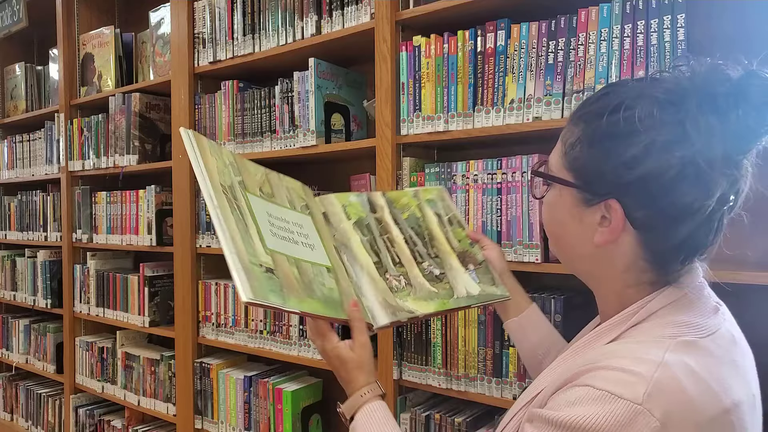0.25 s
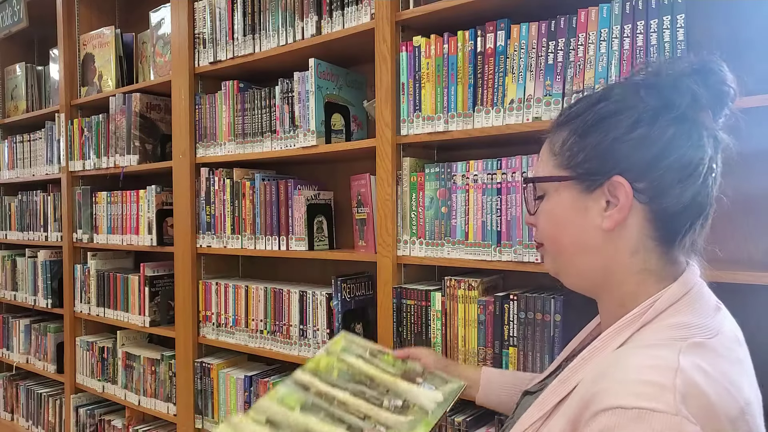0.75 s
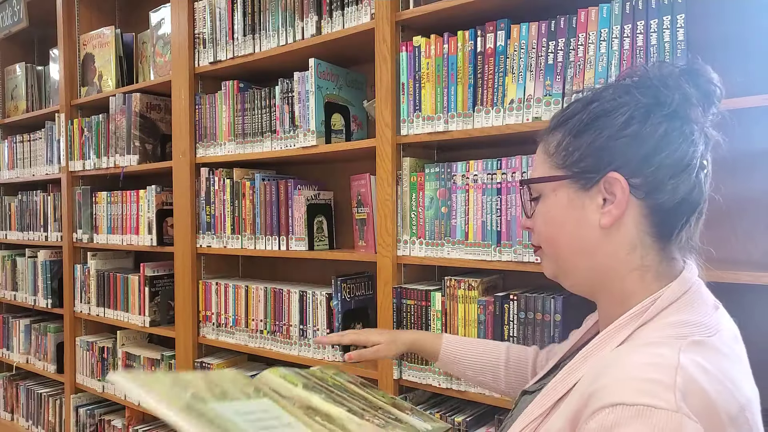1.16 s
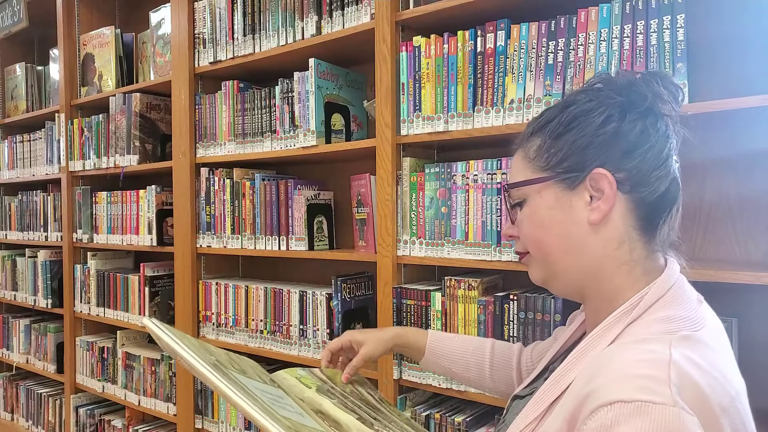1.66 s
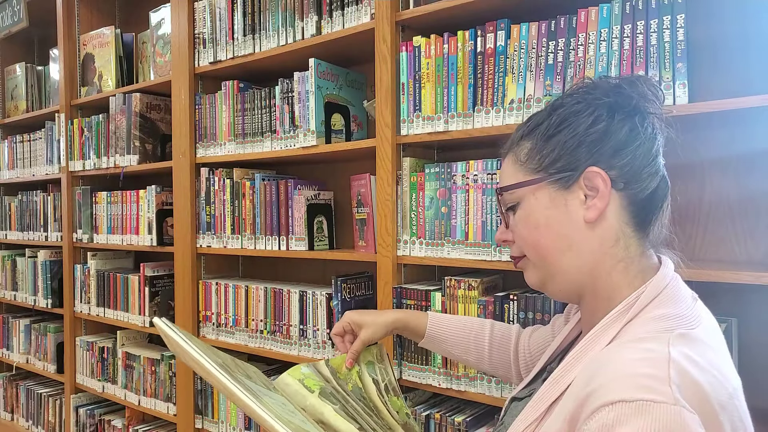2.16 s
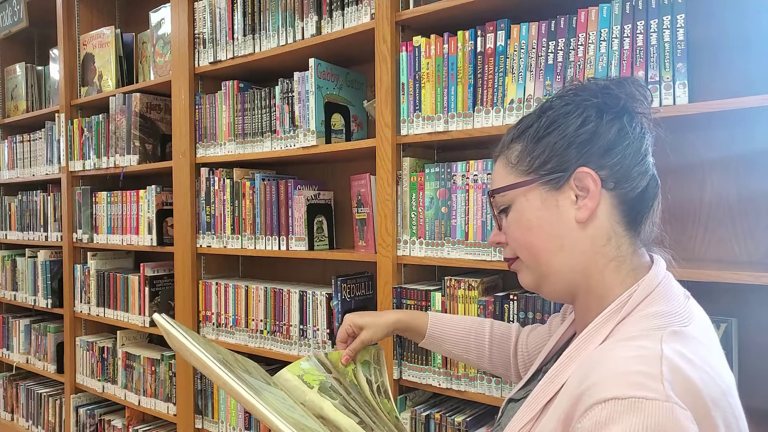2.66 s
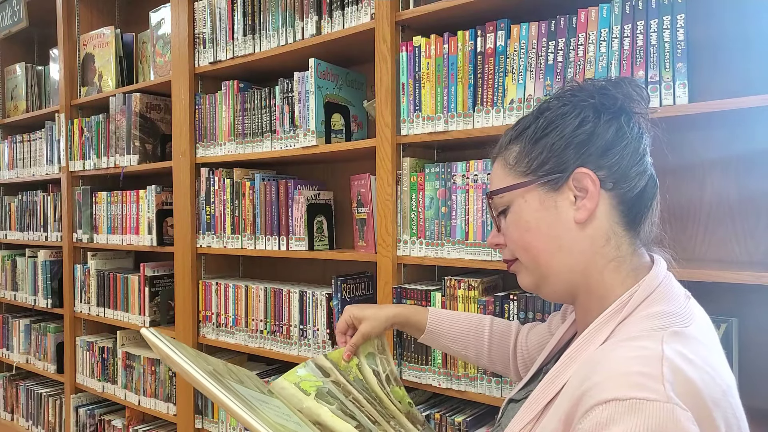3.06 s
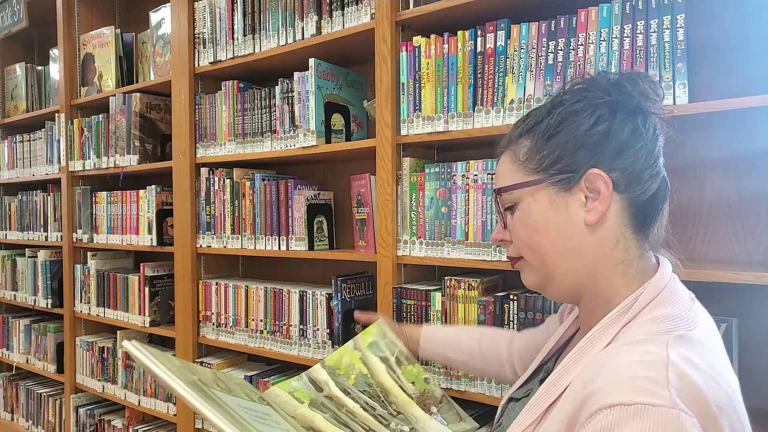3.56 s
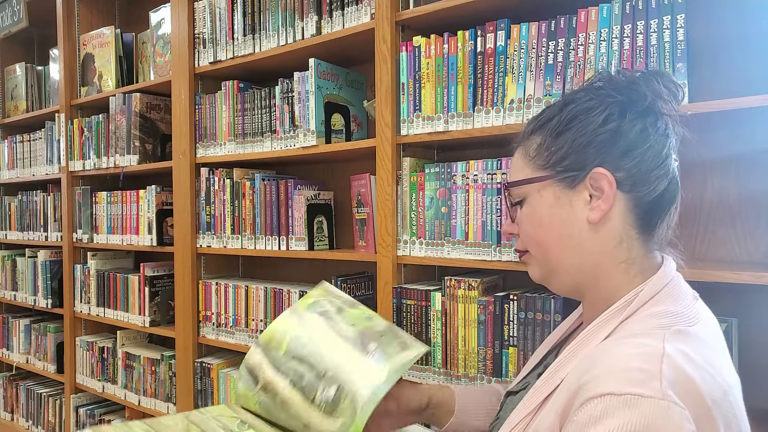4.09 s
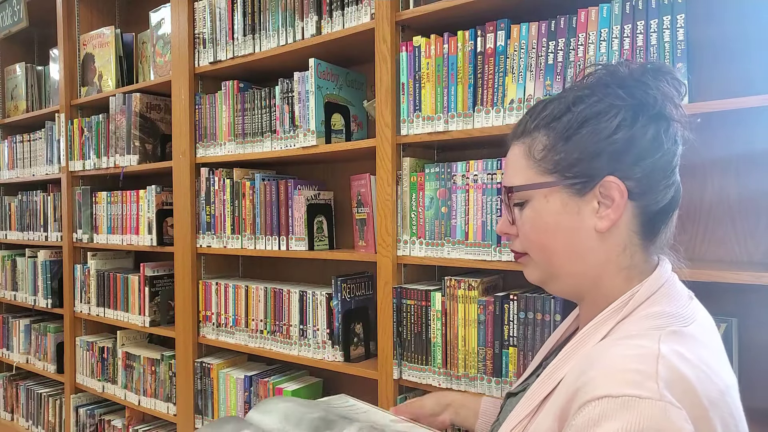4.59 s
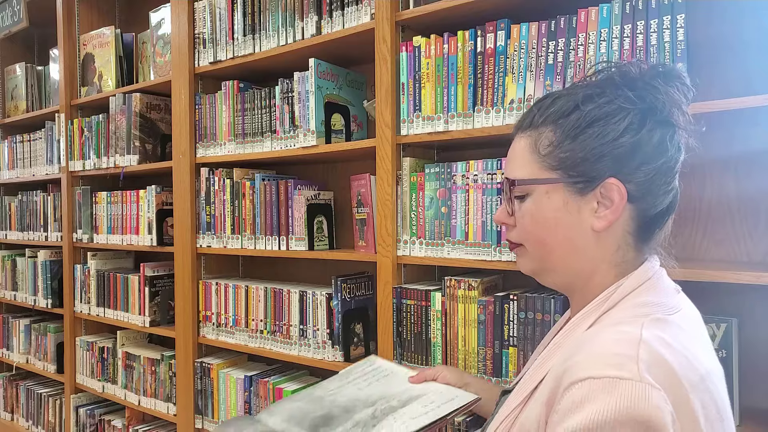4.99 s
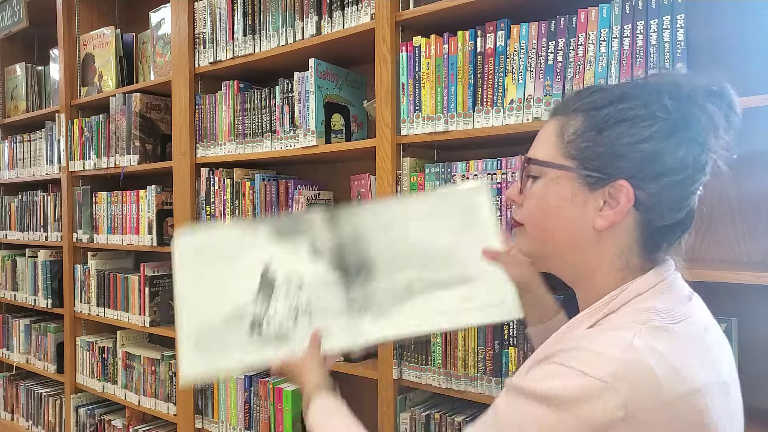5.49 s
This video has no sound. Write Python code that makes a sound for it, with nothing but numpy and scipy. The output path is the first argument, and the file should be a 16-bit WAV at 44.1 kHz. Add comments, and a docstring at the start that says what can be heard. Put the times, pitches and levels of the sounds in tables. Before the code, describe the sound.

A large picture book is handled close by, slightly to the right, in a quiet library. For the first second, hands brush and scuff its glossy pages, with a few crisp ticks around 0.8 seconds. Faint touches follow. From about 2 seconds, a page slides over its neighbour in short, darker pulls, with small ticks and pops near 2.5 seconds. Between 3 and 4 seconds the stiff sheet bends, crackling and buckling in flurries with a hollow, briefly ringing tone. After a short lull it flips over with the loudest cluster of snaps at about 4.4 seconds. From 4.8 seconds, hands rub and rasp dryly across the paper again, fading to light brushes by about 5.6 seconds. The room adds a short, soft reverberation, and a low, steady ventilation hum with faint hiss lies under everything.

```python
"""A quiet library: a large picture book is lowered, a stiff page is turned, and the book is raised again.
Hands brush and scuff the glossy paper and sheet slides on sheet, fibres catching and letting go.
Creases tick, and the bent page buckles in pops and flurries with a hollow, briefly ringing colour.
Shelves give a short, soft reverberation over the hum of the ventilation."""
import sys
import numpy as np
from scipy import signal
from scipy.fft import rfft, irfft
from scipy.io import wavfile

SR = 44100
rng = np.random.default_rng(int(sys.argv[2]) if len(sys.argv) > 2 else 0)


def dump_mix(stems):
    """Bounce the given channels to the path in sys.argv[1] as a 16-bit WAV at rate SR."""
    frames = np.atleast_2d(stems).T  # one column per channel
    limited = np.clip(frames, -1, 1)  # hard clip at full scale
    pcm = np.round(limited * 32767).astype(np.int16)
    wavfile.write(sys.argv[1], SR, pcm)


N = 252770
TIME = np.arange(N) / SR

# tone colour of skin rubbing glossy paper: frequency_hz, gain_db
SKIN_EQ = [(150, -1), (450, -4.5), (650, -6), (1000, 0), (2000, -2), (2900, -1), (4200, -4), (6300, -0.5),
           (7600, -6), (11000, -6.5), (15500, -7)]


def undb(db):
    """Decibels to gain."""
    return 10 ** (np.asarray(db) / 20)


def gain(eq, hz):
    """Gain of a (Hz, dB) curve at the given frequencies."""
    eq_hz, eq_db = np.transpose(eq)
    return undb(np.interp(np.log(hz + 1), np.log(eq_hz), eq_db))


def colour(x, eq, size=2048):
    """Causal filter with the given EQ curve, built from its cepstrum."""
    cepstrum = irfft(np.log(gain(eq, np.fft.rfftfreq(size, 1 / SR))))
    cepstrum[1:size // 2] *= 2
    cepstrum[size // 2 + 1:] = 0
    response = irfft(np.exp(rfft(cepstrum)))[:size // 2]
    response = response.reshape((1,) * (x.ndim - 1) + (-1,))
    return signal.fftconvolve(x, response, axes=-1)[..., :x.shape[-1]]


def band(x, hz, kind, order=2):
    """Butterworth filter."""
    sos = signal.butter(order, np.minimum(hz, SR / 2 - 1), kind, fs=SR, output="sos")
    return signal.sosfilt(sos, x)


def rms(x):
    """Root mean square."""
    return np.sqrt(np.mean(x ** 2)) + 1e-12


def unit_band(x, low_hz, high_hz):
    """One band of a stereo sound, scaled so that its mono mix has rms 1."""
    y = band(x, [low_hz, high_hz], "band", order=3)
    return y / rms(y.mean(axis=0))


def add(track, start_s, x):
    """Mix a sound into a track."""
    i = max(int(start_s * SR), 0)
    track[..., i:i + x.shape[-1]] += x[..., :N - i]


def wander(rate_hz):
    """Smooth random drift with a standard deviation near 1."""
    return np.interp(TIME * rate_hz, np.arange(4096), rng.standard_normal(4096)) * np.sqrt(1.5)


def grains(per_s, spread_db):
    """Random tiny impulses of either sign, a few much larger than the rest."""
    size = undb(spread_db * np.minimum(rng.exponential(size=N), 4))
    x = (rng.random(N) < per_s / SR) * size * np.sign(rng.standard_normal(N))
    return x / rms(x)


def widen(centre, side, above_hz, width):
    """A broad source: left and right agree in the bass and part in the treble."""
    side = width * band(side, above_hz, "high", order=1)
    return np.array([centre + side, centre - side])


def burst(x, start_s, hold_s, attack_s=0.0022, fade_s=0.014):
    """A stretch of x, brought to rms 1, that rises, holds, then dies away."""
    piece = x[..., int(start_s * SR):][..., :SR // 5]
    t = TIME[:piece.shape[-1]]
    envelope = np.minimum(t / attack_s, 1) * np.exp(-np.maximum(t - hold_s, 0) / fade_s)
    return piece / rms(piece[..., t < hold_s + fade_s]) * envelope


def ventilation():
    """Duct rumble and faint hiss under slightly wavering fan and mains tones."""
    # tone colour of the duct air: frequency_hz, gain_db
    air_eq = [(15, -41.5), (33, -7), (52, 2.5), (80, -11), (102, -5), (150, -14), (240, -18), (400, -25),
              (600, -39.5), (1200, -42), (2800, -48), (6200, -41.5), (7400, -54), (16000, -53)]
    # fan and mains tones: pitch_hz, level_db
    hum_tones = [(34.5, -56.5), (69.2, -50.5), (118.6, -62)]
    centre, side, diffuse = rng.standard_normal((3, N))
    air = widen(centre, side, above_hz=695, width=0.94) + 0.16 * np.array([diffuse, -diffuse])
    air = irfft(rfft(air) * gain(air_eq, np.fft.rfftfreq(N, 1 / SR)), N)
    above_rumble = band(air.mean(axis=0), 135, "high", order=6)
    air *= undb(-61.5) / rms(above_rumble)
    hum = np.zeros(N)
    for pitch_hz, level_db in hum_tones:
        amplitude = np.sqrt(2) * undb(level_db + 1.8 * wander(4.9))
        phase = 2 * np.pi * np.cumsum(pitch_hz + 1.246 * wander(5)) / SR
        hum += amplitude * np.sin(phase)
    return air + hum


def room(x, early_db, early_t60, late_db, late_t60, treble_t60):
    """Near shelves scatter the sound at once; the aisle holds a soft tail, shorter in the treble."""
    t = TIME[:SR // 2]
    early, late = rng.standard_normal((2, 2, len(t)))
    early = widen(*early, above_hz=700, width=0.093) * (t > 0.003) * undb(-60 * t / early_t60)
    late = widen(*late, above_hz=750, width=1.0)
    low = band(late, 3000, "low", order=1)
    late = low * undb(-60 * t / late_t60) + (late - low) * undb(-60 * t / treble_t60)
    late *= np.minimum(t / 0.024, 1)
    response = sum(undb(db) * echoes / np.sqrt(np.sum(echoes ** 2) / 2)
                   for db, echoes in [(early_db, early), (late_db, late)])
    return x + signal.fftconvolve(x, response, axes=-1)[:, :N]


def friction(eq, per_s, spread_db, judder_db, crackle_db):
    """Fibres catch and let go in uneven spurts, with a sparser crackle, and the paper radiates them."""
    catches = widen(grains(per_s, spread_db), grains(per_s, spread_db), above_hz=2100, width=1.0)
    crackle = undb(crackle_db) * grains(per_s=130, spread_db=1.1)
    return colour(catches * undb(judder_db * wander(110)) + crackle, eq)


def rubbing(strokes, texture, body_low_hz, edge_hz, edge_db, edge_spread):
    """Each stroke speeds up and slows: the surface hisses, the sheet sounds and its edge rasps."""
    hiss = unit_band(texture, 8530, 14250)
    rasp = unit_band(texture, 2350, 6450)
    body = unit_band(texture, body_low_hz, 2130)
    # narrow resonances of the edge take turns as the point of contact moves
    centres_hz = edge_hz * (1 + edge_spread * np.linspace(-1, 1, 4))
    edge = sum(undb(4.5 * wander(22)) * band(rasp, [hz - 140, hz + 140], "band", order=1)
               for hz in centres_hz)
    rasp = undb(-2.5) * rasp + undb(edge_db) * edge
    linger = 0.22  # share of the swell and fade spent near top speed
    out = np.zeros((2, N))
    for fastest_s, level_db, swell_s, fade_s, hiss_db, body_db in strokes:
        from_peak = np.clip(np.maximum((fastest_s - TIME) / swell_s, (TIME - fastest_s) / fade_s), 0, 20)
        speed = np.exp(linger - np.hypot(from_peak, linger))
        out += undb(level_db) * speed * (rasp + undb(hiss_db) * hiss + undb(body_db) * body)
    return out


def hand_brushes():
    """Skin glides over the glossy pages with a fine, bright friction."""
    # strokes of a hand: fastest_s, level_db, swell_s, fade_s, hiss_db, body_db
    strokes = [(0.075, -61, 0.014, .035, -4, -13), (0.18, -51, 0.028, 0.046, -0.5, -6),
               (0.565, -63, 0.014, 0.081, -5.5, -5.5), (0.695, -69, 0.022, 0.026, 4, 3),
               (0.82, -47.5, 0.033, 0.035, 0.5, -3.5), (0.934, -42, 0.0056, 0.037, -3, -1.5),
               (1.098, -67.5, 0.0022, .035, 3, -5), (1.205, -56.5, 0.009, 0.036, -12, -20),
               (1.43, -65, 0.002, 0.049, 0, -1), (1.712, -67.5, 0.0081, 0.076, 4, -1.5),
               (3.405, -66, .03, 0.094, -2.5, -4), (3.68, -64.5, 0.041, 0.13, -14, -4.5),
               (3.82, -82, 0.09, 0.038, 11, -6), (3.96, -63, 0.018, 0.19, -6, 0),
               (4.2, -61, 0.045, 0.043, -6.5, -1), (4.295, -72, 0.036, 0.017, 7, -18),
               (4.385, -56, 0.0095, 0.05, -16.5, -1), (4.467, -53, 0.011, 0.054, -2.5, -3),
               (4.85, -44, 0.021, 0.078, -2, -2), (5.012, -56, .007, 0.023, 7, -6),
               (5.112, -53, 0.016, 0.098, 0.5, 2.5), (5.48, -62.5, 0.063, 0.08, -17, -9),
               (5.55, -76, 0.017, 0.043, 3, -13)]
    skin = friction(SKIN_EQ, per_s=13000, spread_db=3.0, judder_db=2.5, crackle_db=-10)
    return rubbing(strokes, skin, body_low_hz=302, edge_hz=4040, edge_db=-9, edge_spread=0.072)


def hand_scuffs():
    """A hand sticks, then slips with a short dry rasp."""
    # slips of skin on paper: start_s, level_db, hold_s
    slips = [(0.118, -49, 0.0054), (0.141, -49, 0.008), (0.719, -51, 0.0055), (0.765, -42, 0.0043),
             (0.804, -37.5, .006), (0.844, -41.5, 0.02), (0.972, -47, 0.0056), (1.426, -52.5, .005),
             (1.707, -54.5, 0.0049), (4.844, -34.5, 0.011), (4.881, -35, 0.014), (4.906, -42, 0.013),
             (5.001, -43, 0.0079), (5.044, -43, 0.023), (5.149, -39.5, 0.0051), (5.282, -47.5, 0.016),
             (5.341, -51.5, 0.014), (5.591, -58, 0.023)]
    skin = friction(SKIN_EQ, per_s=5000, spread_db=6.0, judder_db=2.0, crackle_db=-25)
    out = np.zeros((2, N))
    for start_s, level_db, hold_s in slips:
        rasp = burst(skin, start_s, hold_s, attack_s=0.00016, fade_s=0.0084)
        add(out, start_s, undb(level_db) * rasp)
    return out


def page_slides():
    """The page drags over its neighbour in short pulls, darker than skin on paper."""
    # tone colour of paper rubbing paper: frequency_hz, gain_db
    paper_eq = [(150, 16), (450, 9.5), (750, 13), (1200, 10), (1800, 5), (2500, 0), (3100, -2), (4000, 2),
                (5000, -2.5), (6300, -3), (7400, -16.5), (11500, -23.5), (15500, -25)]
    # pulls of the page: fastest_s, level_db, swell_s, fade_s, hiss_db, body_db
    pulls = [(1.97, -69.5, .08, 0.046, -14, 1), (2.044, -47.5, 0.015, 0.022, -18.5, -21),
             (2.09, -53.5, 0.052, .075, -23.5, 3.5), (2.23, -53.5, 0.055, 0.029, -6.5, -2.5),
             (2.365, -51, 0.0052, 0.0098, -14, 11), (2.41, -73, 0.1, 0.074, -2.5, 14),
             (2.625, -41.5, 0.029, 0.039, -11.5, -12.5), (2.725, -44.5, 0.028, 0.056, -10, -4.5),
             (2.91, -62, 0.017, 0.052, 1.5, -8), (2.968, -50.5, 0.036, 0.024, -12, 1.5),
             (3.075, -48, 0.02, 0.019, -11, 3), (3.135, -49.5, .02, 0.014, -8.5, -1),
             (3.215, -59.5, 0.029, 0.023, -3.5, 8), (3.372, -46.5, 0.029, 0.037, -11.5, 10)]
    paper = friction(paper_eq, per_s=7000, spread_db=2.5, judder_db=2.0, crackle_db=-12.5)
    return rubbing(pulls, paper, body_low_hz=290, edge_hz=3070, edge_db=-10, edge_spread=0.21)


def crease_ticks():
    """A crease gives way: a sharp click and a few milliseconds of fibre crackle."""
    # crisp ticks of creases and page edges: start_s, peak_db, cutoff_hz
    ticks = [(0.178, -27, 12000), (0.7642, -27, 14900), (0.8119, -21, 15200), (0.991, -23, 4950),
             (2.484, -36.5, 7060), (2.5174, -27.5, 6030), (2.981, -23.5, 5050), (3.074, -29, 7800),
             (3.1854, -26.5, 5040), (3.2993, -32, 7050), (3.32, -26.5, 4300), (3.345, -18, 3800),
             (3.365, -16.5, 3900), (3.428, -24.5, 4120), (4.131, -36, 4640), (4.155, -34, 5170),
             (4.825, -24, 15800), (5.005, -28, 14000), (5.15, -30, 14000)]
    out, t = np.zeros((2, N)), TIME[:SR // 50]
    for start_s, peak_db, cutoff_hz in ticks:
        crackle = 0.14 * rng.standard_normal((2, len(t))) * np.exp(-t / 0.0016)
        snap = band(signal.unit_impulse(len(t)) + crackle, 810, "high", order=1)
        tick = band(snap, cutoff_hz, "low", order=6) + undb(-30) * snap
        add(out, start_s, undb(peak_db) * tick / abs(tick).max())
    return out


def page_tone(x):
    """The page radiates a broad hump; a few narrow resonances add a hollow, briefly ringing colour."""
    # tone colour of the stiff sheet: frequency_hz, gain_db
    sheet_eq = [(100, -6.5), (220, 2.5), (400, 3), (600, -1), (850, -2), (1300, -4), (2200, -8.5),
                (5000, -10.5)]
    # narrow resonances that colour the pops and flurries: pitch_hz, bandwidth_hz, gain_db
    resonances = [(588, 9, -26), (750, 12, 8.5), (964, 45, -0.5), (1313, 25, -10.5)]
    x = colour(x, sheet_eq)
    return x + sum(undb(db) * band(x, [hz - width / 2, hz + width / 2], "band", order=1)
                   for hz, width, db in resonances)


def bent_patch(x, centre_hz, octaves):
    """A bent patch radiates in its own register; a larger, lower patch also pushes more air."""
    low_hz, high_hz = centre_hz / 2 ** (octaves / 2), centre_hz * 2 ** (octaves / 2)
    register = band(band(x, low_hz, "high", order=4), high_hz, "low", order=6)
    air_push = undb(-10) * (400 / low_hz) * band(x, [110, 210], "band")
    return register + air_push


def page_flurries(buckles):
    """Buckles run across the bending sheet; the tighter the bend, the higher they sound."""
    # runs of small buckles: start_s, level_db, hold_s, centre_hz, width_octaves
    flurries = [(0.678, -60.5, 0.095, 1280, 1.4), (0.802, -52, 0.053, 1240, 1.6),
                (0.919, -43.5, 0.081, 1620, 1), (2.359, -42.5, 0.009, 1090, 1.65),
                (3.048, -45.5, 0.06, 650, 1.46), (3.207, -46, 0.03, 730, 1.8),
                (3.279, -48.5, 0.017, 955, 1.5), (3.375, -35, 0.04, 705, 2.1),
                (3.369, -43.5, 0.067, 1470, 2.9), (3.653, -50, 0.027, 554, 0.76),
                (3.704, -52, 0.091, 740, 1.45), (3.842, -51, 0.054, 590, 1.7),
                (3.863, -37, 0.056, 720, 2.33), (3.9, -34.5, 0.027, 990, 2.3),
                (3.948, -30, 0.039, 860, 2.17), (4.003, -45, 0.058, 547, 0.7), (4.12, -56, .14, 526, 2.3),
                (4.367, -45.5, 0.023, 1100, 3.2), (4.3797, -27, 0.017, 1350, 1.98),
                (4.408, -35, 0.019, 1210, 1.8), (4.439, -28, 0.012, 1550, 1.4),
                (4.455, -31, 0.021, 1080, 1.9), (4.727, -59, 0.069, 710, 2.7), (4.782, -46, .02, 970, 1.8),
                (5.481, -54, 0.037, 856, 1.7)]
    out = np.zeros((2, N))
    for start_s, level_db, hold_s, centre_hz, octaves in flurries:
        flurry = burst(bent_patch(buckles, centre_hz, octaves), start_s, hold_s)
        add(out, start_s, undb(level_db) * flurry)
    return out


def page_pops(buckles):
    """The curved sheet snaps through: a push of air, a brief ring, then a shiver of small buckles."""
    # snaps of the bent page: start_s, peak_db, centre_hz, width_octaves
    snaps = [(2.364, -52, 1050, 1.5), (2.484, -33.5, 710, 1.7), (2.515, -26.5, 784, 1.6),
             (2.5252, -27.5, 710, .3), (2.981, -35.5, 880, 2.3), (3.1847, -24.5, 640, 1.73),
             (3.2998, -28, 860, 0.96), (3.32, -20, 860, 1.2), (3.3447, -19.5, 677, 2.46),
             (3.3651, -22.5, 760, 2.3), (3.389, -32, 570, 1.1), (3.73, -31.5, 830, 1.75),
             (3.8728, -23.5, 930, 1.64), (3.9044, -22, 910, 1.4), (3.93, -22.5, 800, 0.31),
             (3.958, -21, 960, 2.2), (4.163, -36, 330, 1.8), (4.3985, -12, 1260, 1.6),
             (4.4054, -18.5, 1000, 1.1), (4.4483, -16.5, 1050, 1.2), (4.468, -18.5, 770, 1.2),
             (4.479, -21.5, 710, 1.8)]
    shiver_db = -18.5  # relative to the pop's peak
    push = page_tone(signal.unit_impulse(2048))
    out = np.zeros((2, N))
    for start_s, peak_db, centre_hz, octaves in snaps:
        pop = bent_patch(push, centre_hz, octaves)
        add(out, start_s - 0.0003, undb(peak_db) * pop / abs(pop).max())
        shiver = burst(bent_patch(buckles, centre_hz, octaves), start_s, hold_s=0.0087, fade_s=0.0073)
        add(out, start_s, undb(peak_db + shiver_db) * shiver)
    return out


def scene():
    """All the paper sounds come from a little to the right, in one room, over the ventilation."""
    # stereo balance of the book: frequency_hz, left_minus_right_db
    balance = [(300, 0), (700, -1), (1300, -2.5), (2400, -4), (4400, -7), (8000, -0.5), (15000, 0)]
    centre, side = grains(per_s=1900, spread_db=3.8), grains(per_s=2100, spread_db=2.84)
    buckles = page_tone(widen(centre, side, above_hz=1120, width=0.62))
    book = hand_brushes() + page_slides() + hand_scuffs() + crease_ticks()
    book += page_flurries(buckles) + page_pops(buckles)
    book = room(book, early_db=-9.5, early_t60=0.04, late_db=-13.5, late_t60=0.28, treble_t60=0.16)
    left_gain = np.sqrt(gain(balance, np.fft.rfftfreq(N, 1 / SR)))
    book = irfft(rfft(book) * np.array([left_gain, 1 / left_gain]), N)
    return book + ventilation()


def record(dry):
    """A steep low-pass trims the very top of the treble."""
    cutoff_hz = 16100
    return signal.sosfilt(signal.ellip(10, 0.2, 70, cutoff_hz, fs=SR, output="sos"), dry)


dry = scene()
out = record(dry)
dump_mix(out)
```